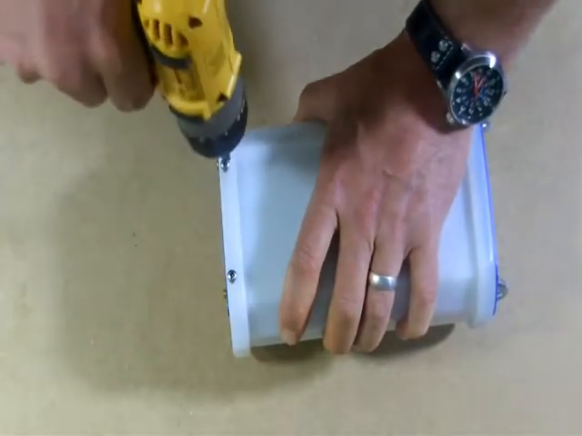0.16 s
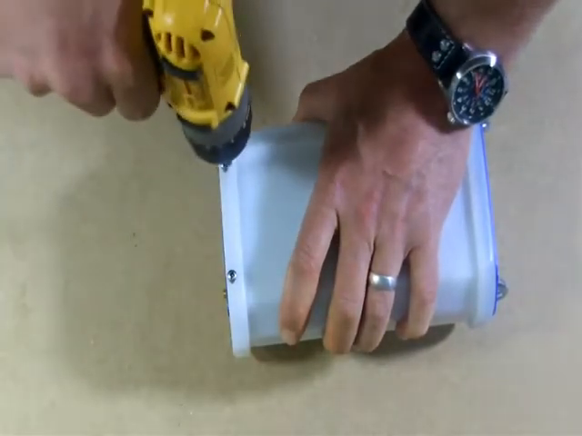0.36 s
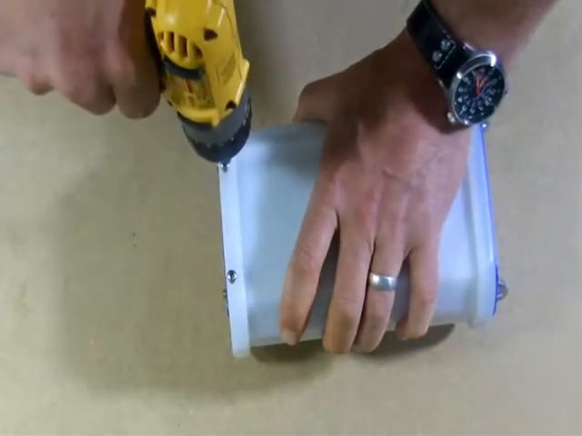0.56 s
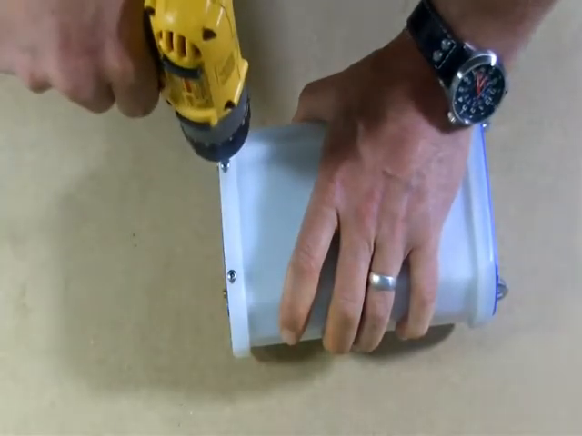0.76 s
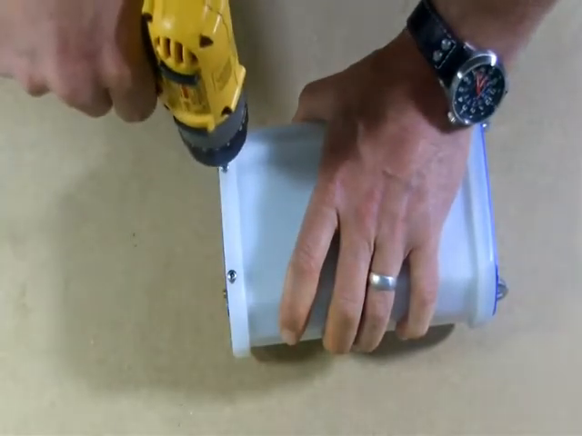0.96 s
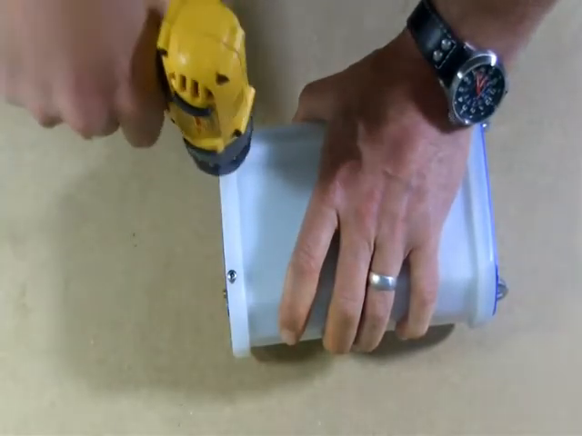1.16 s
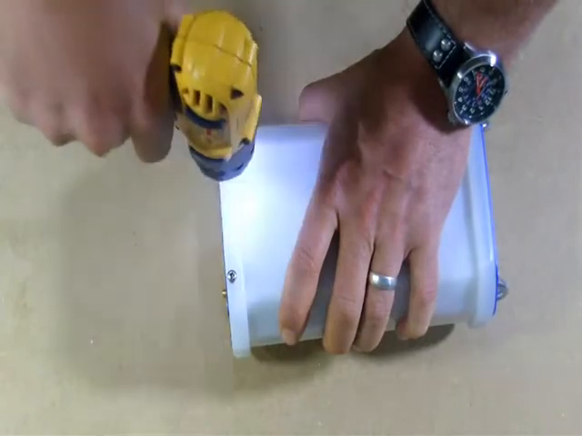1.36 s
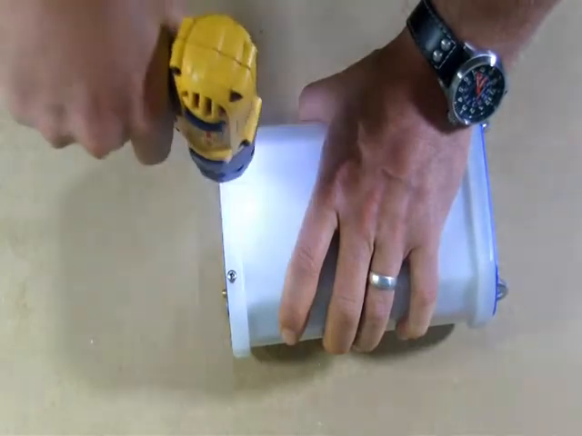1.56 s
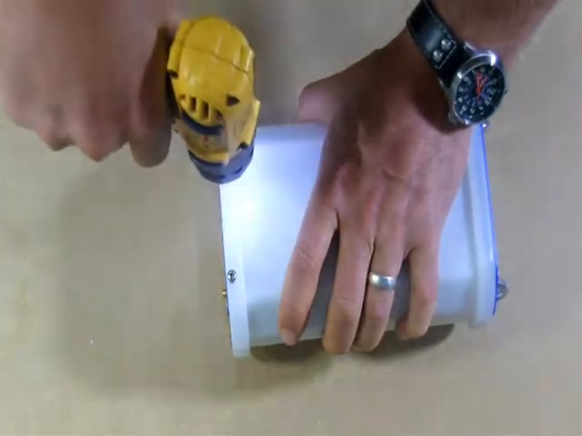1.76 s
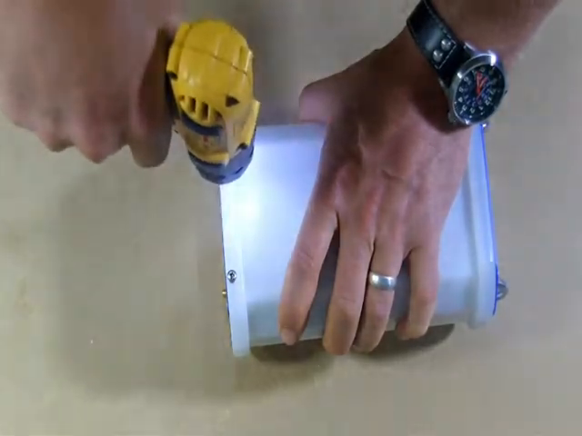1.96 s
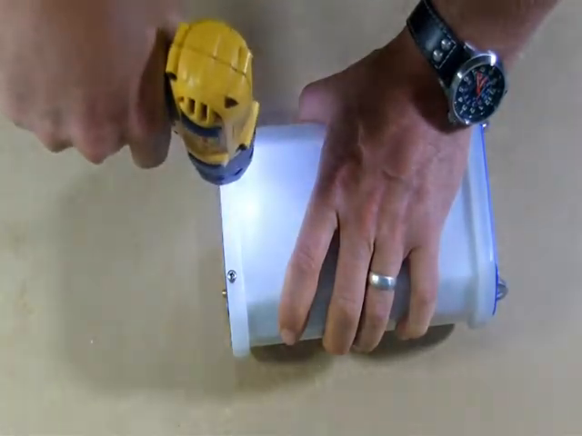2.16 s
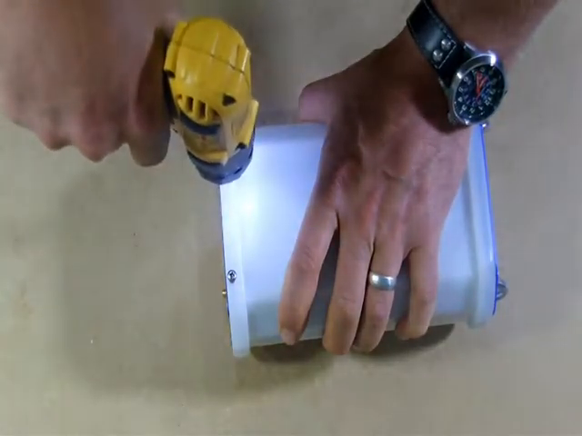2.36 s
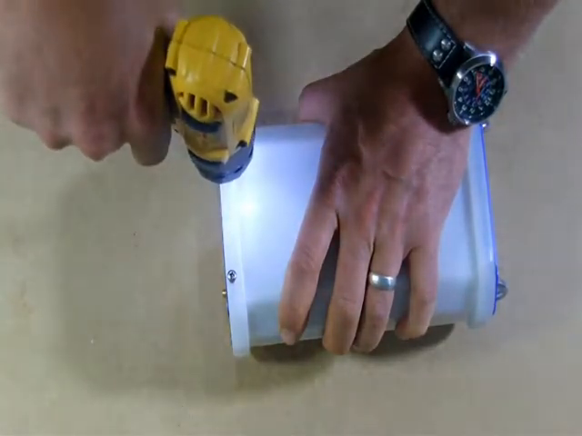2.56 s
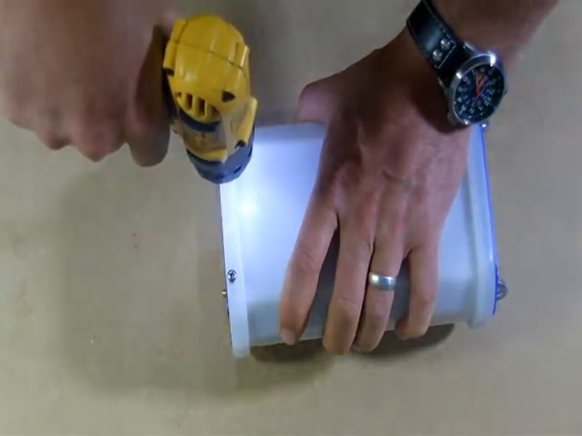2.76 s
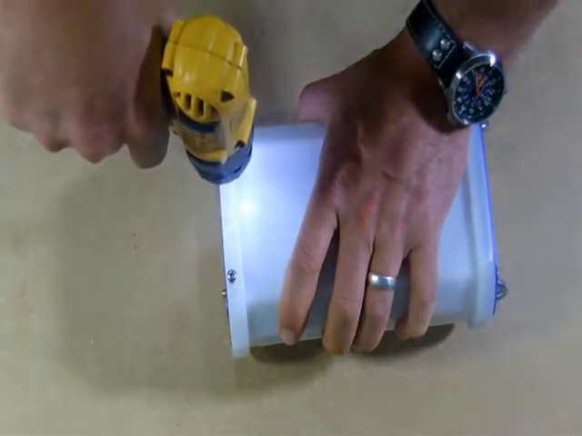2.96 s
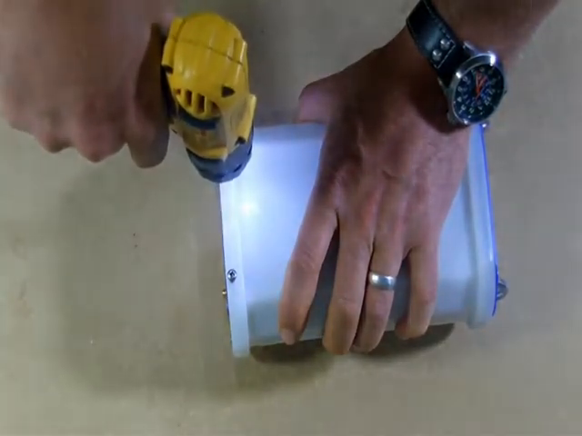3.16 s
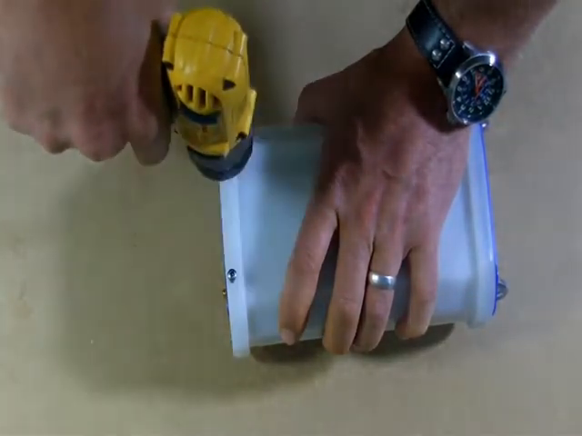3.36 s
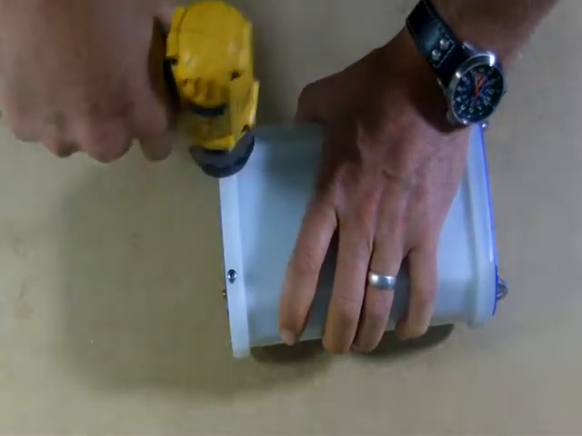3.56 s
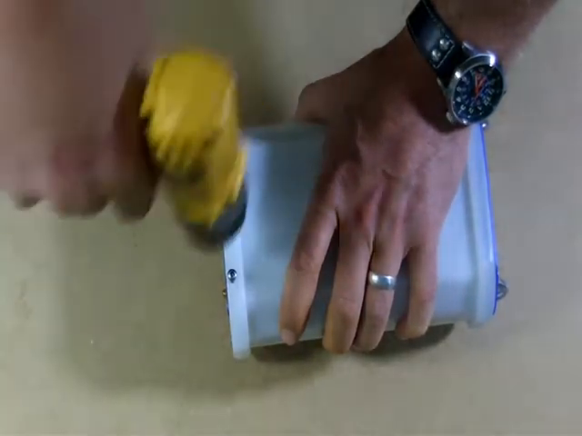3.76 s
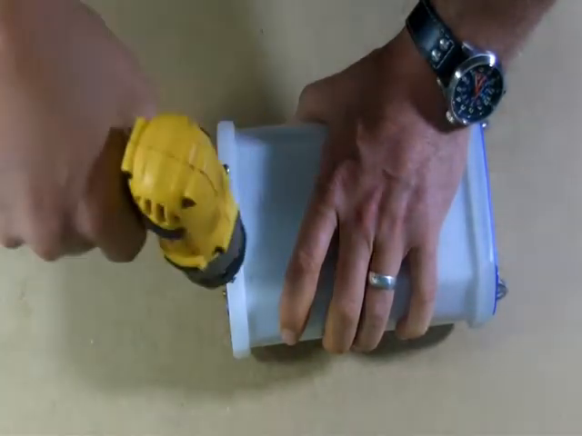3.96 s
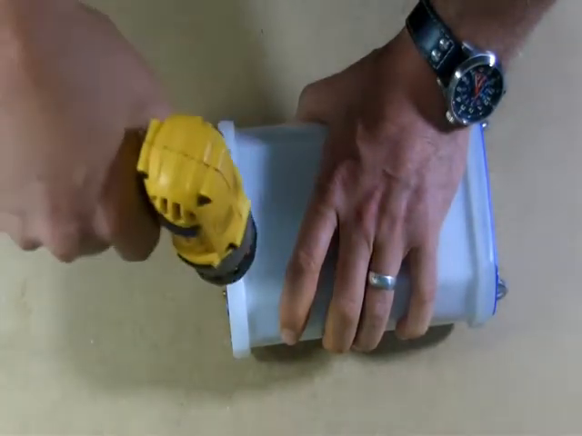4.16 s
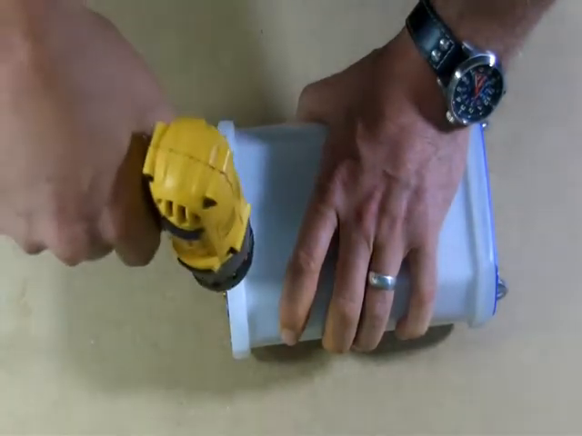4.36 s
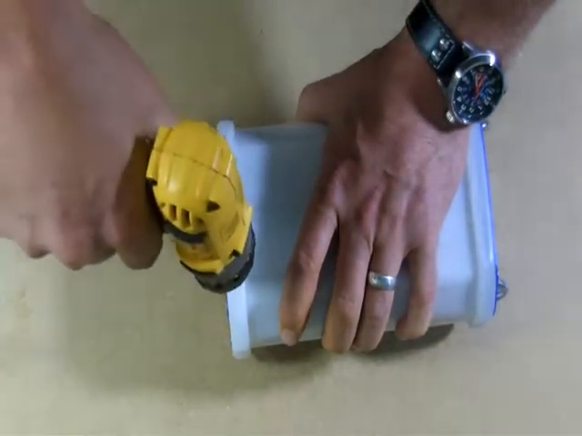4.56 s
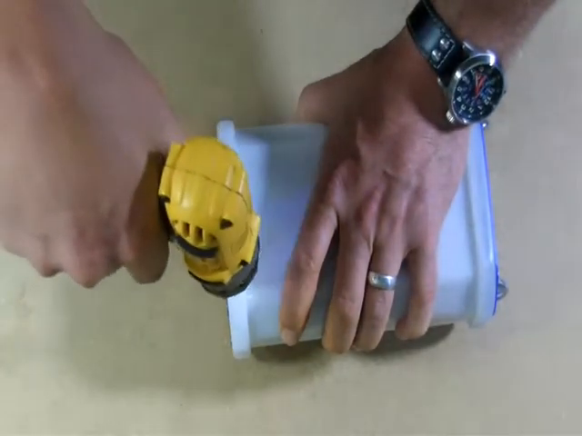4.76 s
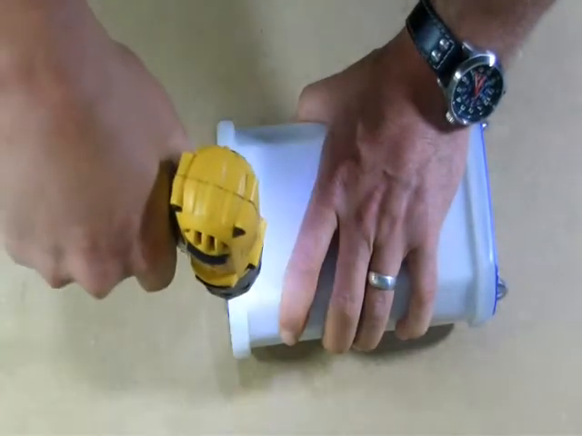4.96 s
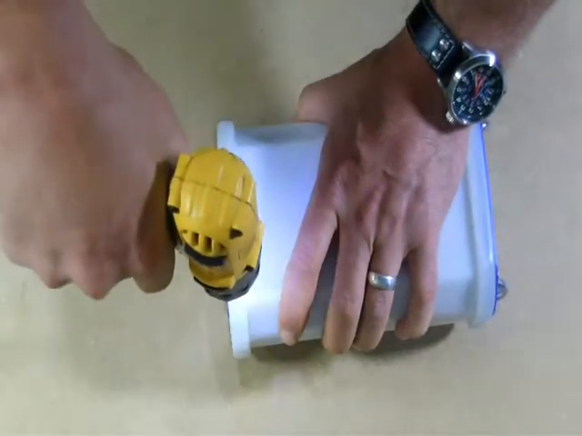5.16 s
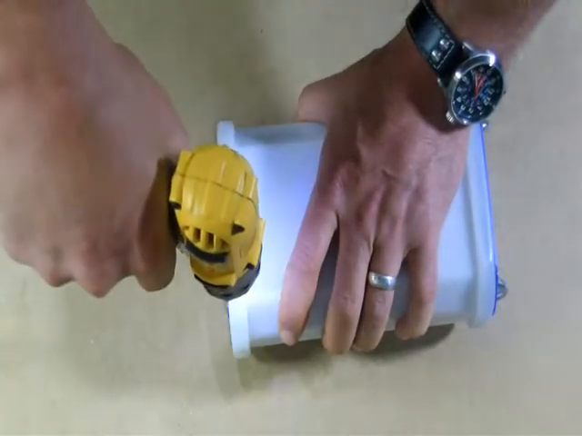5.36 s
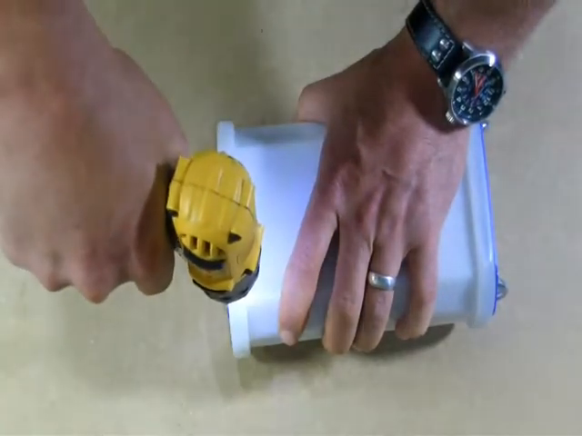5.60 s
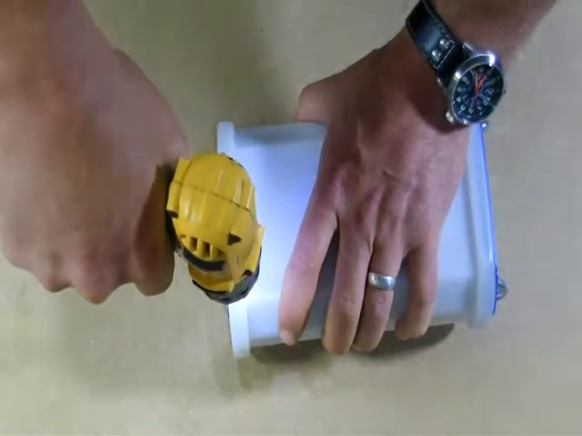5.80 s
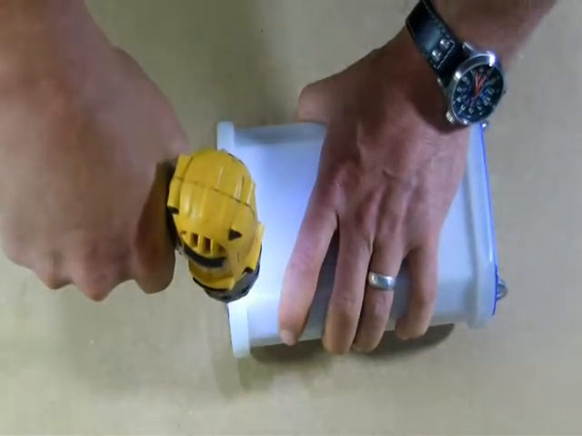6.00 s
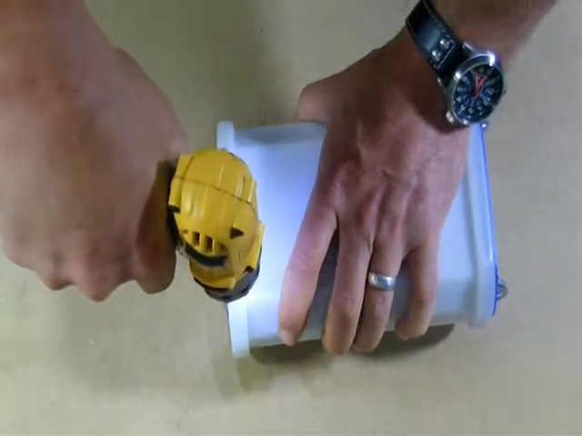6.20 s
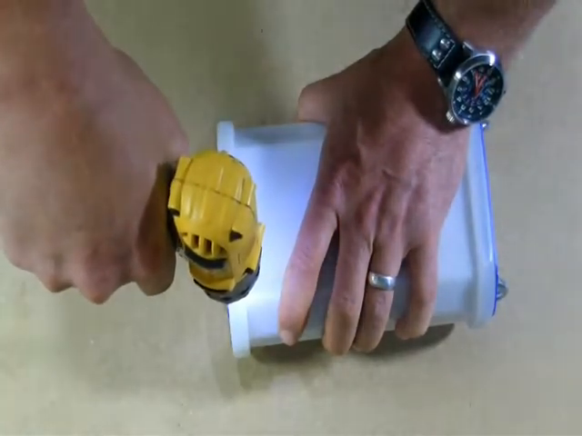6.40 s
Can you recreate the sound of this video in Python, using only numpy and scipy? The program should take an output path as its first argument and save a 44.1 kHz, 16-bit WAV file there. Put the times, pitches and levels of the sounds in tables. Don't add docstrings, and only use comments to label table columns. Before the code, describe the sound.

Close up in a small quiet room, a screw bit ticks lightly on a plastic case. A cordless drill spins up with a whining, rattling buzz and thin high whistle, sags as the screw bites, then strains and stalls. The trigger snaps sharply, the bit taps the next screw, and a second, slower run grinds on to the end over faint microphone hiss.

```python
import sys
import numpy as np
from scipy import signal
from scipy.fft import rfft, irfft
from scipy.io import wavfile
from scipy.ndimage import uniform_filter1d

SR = 44100
rng = np.random.default_rng(int(sys.argv[2]) if len(sys.argv) > 2 else 0)


def pcm_store(signal):
    levels = np.round(np.clip(np.atleast_2d(signal), -1, 1) * 32767)
    wavfile.write(sys.argv[1], SR, levels.astype(np.int16).T)


def amplitude_ratio(level_db):
    exponent = np.asarray(level_db, float) / 20
    return 10 ** exponent


N = 283719
T = np.arange(N) / SR


def level(x, db):
    return x * amplitude_ratio(db) / np.sqrt(np.mean(x ** 2))


def colour(x, points, modes=(), size=4096):
    hz = np.maximum(np.arange(size // 2 + 1) * SR / size, 1)
    p = np.array(points, float)
    db = np.interp(np.log(hz), np.log(p[:, 0]), p[:, 1])
    for mode_hz, width_hz, gain_db in modes:
        db = db + gain_db / (1 + (2 * (hz - mode_hz) / width_hz) ** 2)
    cepstrum = irfft(db * np.log(10) / 20)
    cepstrum[1:size // 2] *= 2
    cepstrum[size // 2 + 1:] = 0
    return signal.fftconvolve(x, irfft(np.exp(rfft(cepstrum))))[:len(x)]


def band(x, lo_hz, hi_hz):
    return signal.sosfilt(signal.butter(2, [lo_hz, hi_hz], "band", fs=SR, output="sos"), x)


def walk(rate):
    hold = int(SR / rate)
    held = rng.standard_normal(2 ** 11)[np.arange(N) // hold % 2 ** 11]
    return 1.13 * uniform_filter1d(uniform_filter1d(held, hold), hold)


def curves(table):
    s, *columns = np.transpose(table)
    return [np.interp(T, s, c) for c in columns], (T >= s[0]) & (T <= s[-1])


def rattle(spread_db, flicker_db):
    return rng.standard_normal(N) * amplitude_ratio(spread_db * rng.exponential(size=N) + flicker_db * walk(150))


FAST_STAGE, ROTOR = 2.7, .335
# pitch_hz, level_db (per Hz)
CASE_COLOUR = [(71, -56), (120, -28), (214, -25.5), (327, -22.5), (476, -12), (594, -4.5), (1040, -10.5),
               (1920, 1.5), (2160, -2.5), (2610, 0.5), (3790, -2.5), (7000, -5.5), (9100, -8),
               (15400, -120)]
HOUSING_COLOUR = [(4500, -33), (6200, -32), (7000, -9.5), (7800, 1.5), (8840, -0.5), (11100, 3),
                  (13600, -1), (14900, -4), (15600, -10), (17000, -47)]
# pitch_hz, width_hz, first_screw_db, second_screw_db
CASE_MODES = [(590, 90, 1, 0), (1230, 90, 3, 1), (1745, 80, 1.5, 2), (1930, 100, 1.5, 2.5),
              (2330, 100, 1, 3), (2610, 130, 3, 5.5), (2950, 150, 1, 2), (3390, 130, 1.5, 6.5),
              (4730, 300, 3, 2)]
HOUSING_MODES = [(7400, 300, 2, -2), (8090, 200, 5, 3), (8420, 150, 2, 3), (9930, 110, 3, 5),
                 (11130, 160, 4, 6), (12660, 300, 3, 3), (13700, 150, 3, 3)]
# pitch_hz, width_hz, level_db
STRAINED_MODES = [(436, 92, 10.5), (1174, 120, 7), (1950, 160, 4.5), (2400, 100, -10), (2900, 650, 7),
                  (3430, 150, 2), (5160, 11000, -11.5)]
WHISTLE_APART_DB = (-9, 7)


def drill():
    gates, runs = zip(*map(controls, range(2)))
    hz, slow_db, fast_db, side_db, strain, case_db, housing_db, whistle_db = np.where(T < 4, *runs)
    running = sum(gates)
    turns = np.cumsum(hz) / SR
    slow, fast, fifth = tooth_whines(hz, turns, slow_db, fast_db)
    rotor = 2 * np.pi * (ROTOR * turns + 0.049 * walk(30))
    hum = rotor_hum(rotor, slow_db, side_db, strain)
    whistle = chopper_whistle(rotor, side_db)
    tones = np.sqrt(2) * (slow + fast + fifth + hum) * running
    out = np.array([tones, amplitude_ratio(-6) * tones + amplitude_ratio(12) * fast * running])

    throb = swell(turns)
    low = [throb * rattle(0.56, 1.0) for _ in range(2)]
    high = [throb * rattle(0.56, 1.0) for _ in range(2)]
    pressed = np.array([level(colour(x, CASE_COLOUR, STRAINED_MODES), 0) for x in low])
    sizzle = amplitude_ratio(-9 + 20 * np.log2(hz / 800))
    for k, on in enumerate(gates):
        case_modes = [(m[0], m[1], m[2 + k]) for m in CASE_MODES]
        housing_modes = [(m[0], m[1], m[2 + k]) for m in HOUSING_MODES]
        case = np.array([level(colour(x, CASE_COLOUR, case_modes), 0) for x in low])
        case = (1 - strain) * case + strain * pressed
        case[0] += amplitude_ratio(-11.5) * flares(low[1], k)
        housing = [level(colour(x, HOUSING_COLOUR, housing_modes), 0) for x in high]
        housing = np.array([x + sizzle * band(x, 10000, 15900) for x in housing])
        gears = amplitude_ratio(case_db) * (case + amplitude_ratio(housing_db + 0.38) * housing)
        sing = np.sqrt(2) * amplitude_ratio(whistle_db + 1.5 + 0.27 * walk(35)) * whistle
        out = out + on * (gears + sing * amplitude_ratio(np.array([[0], [WHISTLE_APART_DB[k]]])))
    return out


# time_s, pitch_hz
SPEED = [
    [(1.27, 60), (1.41, 560), (1.49, 885), (1.62, 962), (1.74, 890), (1.9, 712), (2.2, 648), (2.81, 576),
     (2.92, 330)],
    [(4.79, 60), (4.92, 520), (5.04, 795), (5.17, 810), (5.32, 708), (5.45, 662), (5.7, 620), (6.0, 601),
     (6.43, 579)],
]
# time_s, case_rattle_db
EFFORT = [
    [(1.272, -70), (1.342, -52.5), (1.44, -45.5), (1.9, -45), (2.77, -43.5), (2.976, -50.5), (3.138, -43.5),
     (3.19, -49), (3.235, -85)],
    [(4.79, -77), (4.83, -66.5), (4.91, -48.5), (5.01, -46), (5.37, -44), (6.1, -43), (6.43, -43)],
]
# trigger_released_s, head_seats_s, slow_whine_db, fast_whine_db, whistle_sideband_db, whistle_db
SCREWS = [
    (3.175, 2.98, -62.5, -59, -4.5, -51),
    (6.6, 8, -58.5, -62.5, -12.5, -52.5),
]
LOAD_DB_PER_HZ = (-.001, -.05)
# pitch_hz, width_hz, level_db
FAST_HUMPS = [(1720, 110, 6.5), (2680, 300, 14.5)]


def controls(k):
    released_s, seats_s, slow_db, fast_db, side_db, whistle_db = SCREWS[k]
    (hz,), _ = curves(SPEED[k])
    inertia = int(.05 * SR)
    hz = uniform_filter1d(uniform_filter1d(hz, inertia), inertia)
    (case_db,), on = curves(EFFORT[k])
    hz = hz + 14 * np.maximum(case_db + 50.5, 0) * np.clip((T - seats_s - .07) / .03, 0, 1)
    strain = np.exp(np.minimum(T - seats_s, 0) / 0.31)
    unloaded_hz = np.maximum.accumulate(hz[::-1])[::-1]
    idle_db = -0.3 * np.maximum(550 - hz, 0)
    load_db = LOAD_DB_PER_HZ[k] * np.maximum(unloaded_hz - 600, -30)
    slow_db = slow_db + load_db + idle_db - 4.0 * strain
    humps_db = sum(db / (1 + (2 * (FAST_STAGE * hz - f) / w) ** 2) for f, w, db in FAST_HUMPS)
    fast_db = fast_db + idle_db + humps_db
    side_db = side_db + 3.0 * strain + 0.29 * (1 - strain) * idle_db
    housing_db = 2 + 5.5 * np.log2(np.maximum(hz, 623 * (1 - strain)) / 600)
    whistle_db = whistle_db + strain * (-7.5 + 1.5 * (case_db + 43))
    whistle_db = whistle_db - 800 * np.maximum(T - released_s, 0)
    whistle_db = whistle_db - 6 * np.exp(-np.maximum(T - EFFORT[k][0][0], 0) / 0.041)
    return on, np.array([hz, slow_db, fast_db, side_db, strain, case_db, housing_db, whistle_db])


def tooth_whines(hz, turns, slow_db, fast_db):
    slow = amplitude_ratio(slow_db + 1.4 * walk(25)) * np.sin(2 * np.pi * (turns + .035 * walk(30)))
    fast_phase = 2 * np.pi * (FAST_STAGE * turns + .26 * walk(50))
    strands = 1 + 0.13 * np.cos(2 * np.pi * 0.28 * turns)
    overtone = amplitude_ratio(-13) * np.sin(2 * fast_phase + 1.5 * walk(80))
    fast = amplitude_ratio(fast_db + 4.9 * walk(40)) * strands * (np.sin(fast_phase) + overtone)
    fifth = amplitude_ratio(fast_db - 3) * (hz / 940) ** 4 * np.sin(2 * np.pi * (4.95 * turns + .35 * walk(120)))
    return slow, fast, fifth


# multiple of the rotor rate, level_db against the slow whine
ROTOR_ORDERS = [(1, -19.5), (2, -13.5), (4, -6)]


def rotor_hum(rotor, slow_db, side_db, strain):
    base_db = slow_db + 0.57 * side_db - 12.3 * strain
    return sum(amplitude_ratio(base_db + db + 4.0 * walk(22)) * np.sin(k * rotor) for k, db in ROTOR_ORDERS)


# from_s, to_s, shift_hz
WHISTLE_DIPS = [
    (1.2, 1.78, -16),
    (1.78, 2.6, -5),
    (4.7, 4.97, -10),
    (5.33, 5.42, -9),
    (5.86, 6.26, -11),
]


def chopper_whistle(rotor, side_db):
    dips = sum(dip * ((T > a) & (T < b)) for a, b, dip in WHISTLE_DIPS) * 1.
    whistle_hz = 7820 + uniform_filter1d(dips, size=1500)
    chop = 2 * np.pi * (np.cumsum(whistle_hz) / SR + 0.065 * walk(25))
    sidebands = np.sin(chop - rotor) + amplitude_ratio(-12) * np.sin(chop + rotor)
    return np.sin(chop) + amplitude_ratio(side_db) * sidebands


# multiple of the tooth rate, depth_db
THROBS = [(.025, 0), (.11, 0.95), (.255, 0.9)]


def swell(turns):
    return amplitude_ratio(sum(db * np.cos(2 * np.pi * (k * turns + 0.13 * walk(5.6))) for k, db in THROBS))


def flares(x, k):
    total = 0
    for mode in CASE_MODES[2:8]:
        hz, width_hz = mode[:2]
        flare = amplitude_ratio(2.0 * mode[2 + k] + 3.0 * walk(14))
        total = total + flare * band(x, hz - width_hz / 4, hz + width_hz / 4)
    return level(total, 0)


# start_s, peak_db, ring_hz, hardness_db
TAPS = [(0.269, -53, 2770, -7), (0.666, -54, 2260, -1), (0.674, -44.5, 2250, 0.5),
        (0.699, -49.5, 1750, -10), (0.712, -50, 1220, 1.5), (0.725, -43, 645, 3), (.752, -47, 2300, 9),
        (0.778, -43, 664, -28), (.79, -55, 650, -9), (0.844, -55, 605, -8), (0.97, -48, 2330, -20),
        (0.989, -41, 740, -12), (0.998, -50, 596, -20), (1.017, -44.5, 2480, -3), (1.024, -42.5, 1590, -22),
        (1.03, -52, 567, -24), (1.144, -49.5, 1720, -26), (1.195, -56, 1800, 12), (4.405, -52, 1950, -15),
        (4.466, -47.5, 600, -6), (4.4976, -30.5, 3660, -5), (4.503, -31, 1860, -6), (4.505, -47, 590, -22),
        (4.529, -57, 1750, 5), (4.637, -49.5, 1660, -11), (4.69, -62, 1300, -5)]
SNAPS = [(3.417, -45.5, 1790, -27), (3.448, -54, 1940, -27), (3.458, -35, 2840, -15),
         (3.462, -16, 2820, 9.5), (3.466, -52, 180, -20), (3.467, -34, 1790, -5), (3.473, -46, 1880, -14),
         (3.498, -46.5, 1720, -15), (3.552, -44.5, 1890, 4), (3.575, -41, 1760, 9), (4.229, -42, 1850, 3),
         (4.233, -30.5, 2900, 5.5), (4.239, -27.5, 2960, 1.5), (4.246, -42, 570, -11),
         (4.255, -31, 2900, 20)]
CATCHES = [
    (1.336, -29.5, 2110, -1.5),
    (1.361, -33, 2500, -6),
    (1.401, -26, 2000, -6),
    (1.454, -21, 2220, 2),
    (3.127, -23, 2950, 1),
    (4.807, -47.5, 1930, -4),
    (4.839, -42.5, 2575, -7),
    (4.915, -34.5, 1950, -19),
    (4.96, -26.5, 1960, -14),
    (4.998, -22, 1950, 3),
]
# level_db for taps, snaps, catches
THUMP_DB = (-12, -17, -24)


def ticks():
    out, t = np.zeros(N + 4096), np.arange(4096) / SR
    touches = [(*row, db) for rows, db in zip((TAPS, SNAPS, CATCHES), THUMP_DB) for row in rows]
    for start_s, peak_db, ring_hz, hardness_db, thump_db in touches:
        low_db = thump_db - .7 * hardness_db
        noise = rng.standard_normal((4, 4096)) * (1 - np.exp(-t / 0.00085))
        thump = noise[0] * np.exp(-t / 0.016)
        thump = band(thump, 100, 1300) + 1.2 * band(thump, 480, 610)
        crack = band(noise[1] * (np.exp(-t / .002) + .25 * np.exp(-t / .010)), 1000, 5500)
        snap = band(noise[2] * (np.exp(-t / .001) + .12 * np.exp(-t / .006)), 8000, 13500)
        ring = band(noise[3] * np.exp(-t / .003), .87 * ring_hz, 1.13 * ring_hz)
        ring_db = (low_db + 1.5 if ring_hz < 900 else 0) - 2.0
        parts = zip((thump, crack, ring, snap), (low_db - 8.5, 0, ring_db, hardness_db + 2.5))
        hit = sum(amplitude_ratio(db) * part / np.abs(part).max() for part, db in parts)
        i = int((start_s + .0008) * SR)
        out[i:i + 4096] += hit * amplitude_ratio(peak_db - 3.5) / np.abs(hit).max()
    return out[:N]


# peak_s, level_db, fade_db_per_s
RUSTLE = [
    (.75, -72, 79),
    (1.05, -66.5, 40),
    (3.52, -66.5, 17),
    (4.41, -68, 80),
]


def rustle():
    grain = level(band(rattle(2.5, 2.6), 560, 2070), 0)
    return sum(amplitude_ratio(db - 6.5 - fade * np.abs(T - s)) for s, db, fade in RUSTLE) * grain


def tail(t60_s, dull_hz):
    t = np.arange(int(.4 * SR)) / SR
    h = band(rng.standard_normal(len(t)), 95, dull_hz) * np.exp(-np.log(1000) * t / t60_s)
    return h / np.sqrt(np.sum(h ** 2))


# pitch_hz, level_db (per Hz)
HISS_MID = [(15, -52), (25, -23), (112, -8.5), (172, -10), (271, -4.5), (326, -7.5), (475, -7), (529, -7),
            (1210, -10), (1910, -12), (2780, -14), (3440, -14), (15000, -15)]
HISS_SIDE = [(15, -70), (25, -32), (49, -30), (293, -17.5), (691, -6.5), (1460, -9.5), (5720, -9.5),
             (9770, -12), (15000, -7.5)]


def hiss():
    mid = level(colour(rng.standard_normal(N), HISS_MID, size=8192), -67.5) * amplitude_ratio(0.14 * walk(3.55))
    side = level(colour(rng.standard_normal(N), HISS_SIDE, size=8192), -66)
    return mid, side


# pitch_hz, side_minus_mid_db
WIDTH = [(60, -22), (110, -11), (200, -79), (380, -46), (700, -25), (1290, -28.5), (2380, -24), (4400, -20),
         (8120, -9.5), (15000, -8)]


def scene():
    touch = ticks() + rustle()
    tool, tool_apart = drill()
    near = tool + touch
    mid = near + amplitude_ratio(-16) * signal.fftconvolve(near, tail(0.18, 6000))[:N]
    touch_apart = signal.fftconvolve(touch, tail(0.034, 16000))[:N]
    side = colour(tool_apart + touch_apart, WIDTH)
    hiss_mid, hiss_side = hiss()
    mid, side = mid + hiss_mid, side + hiss_side
    return np.array([mid + side, mid - side]) * amplitude_ratio(np.array([[-.15], [.15]]))


def roll_off(x):
    return signal.sosfilt(signal.butter(12, 16510, fs=SR, output="sos"), x)


def record(dry):
    mix = signal.sosfilt(signal.ellip(8, .2, 45, 15120, fs=SR, output="sos"), dry)
    return roll_off(mix)


dry = scene()
out = record(dry)
pcm_store(out)
```